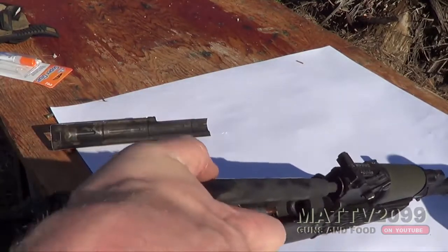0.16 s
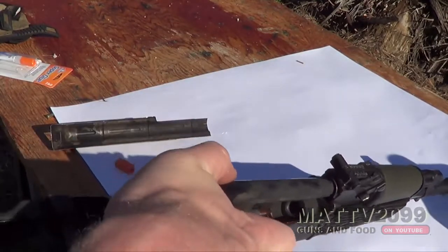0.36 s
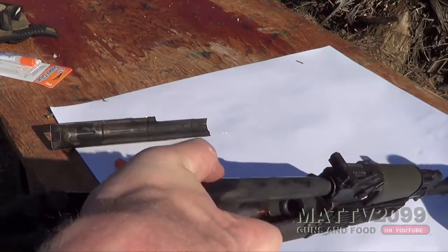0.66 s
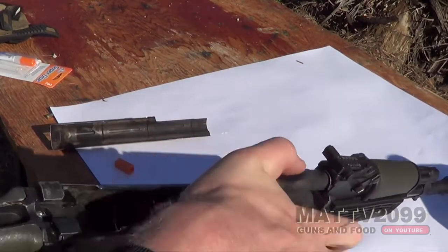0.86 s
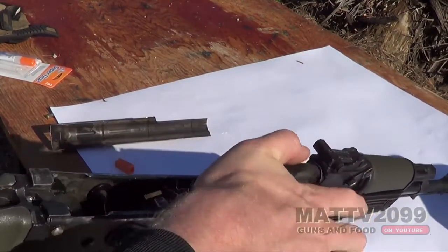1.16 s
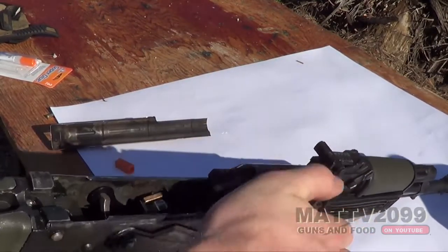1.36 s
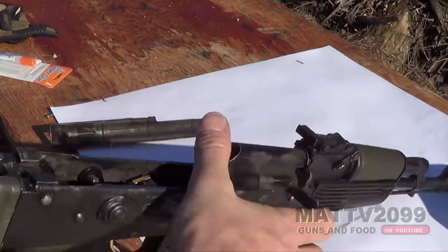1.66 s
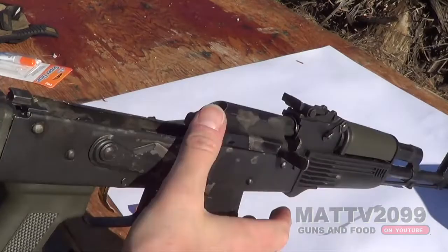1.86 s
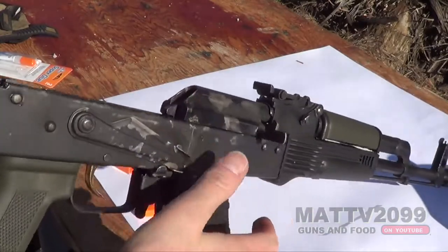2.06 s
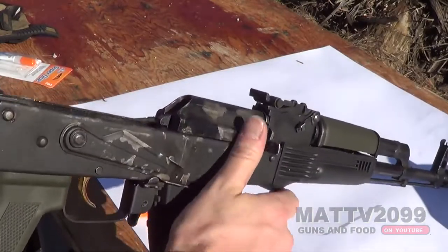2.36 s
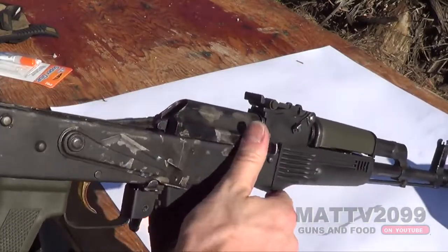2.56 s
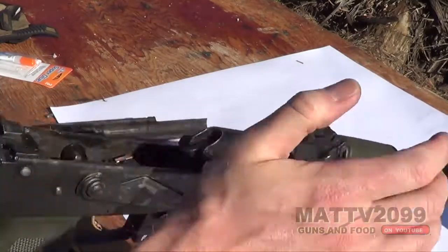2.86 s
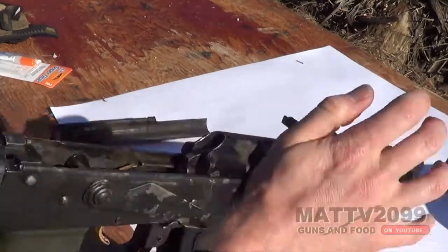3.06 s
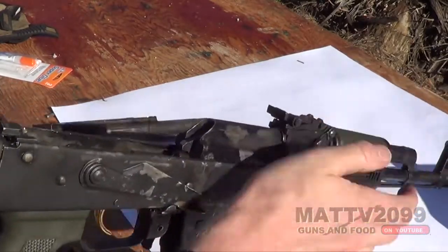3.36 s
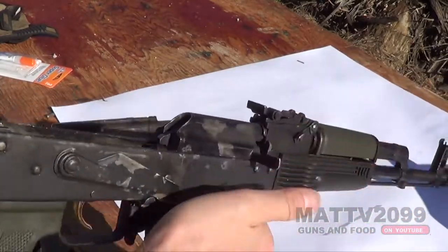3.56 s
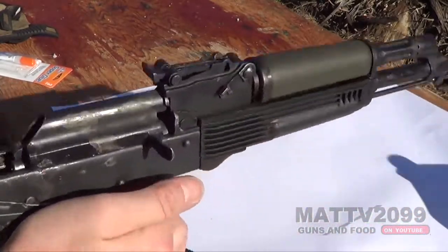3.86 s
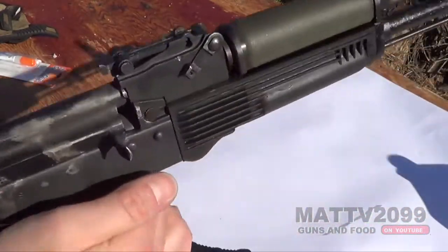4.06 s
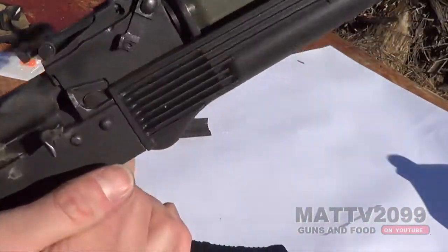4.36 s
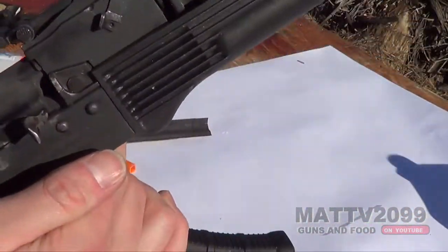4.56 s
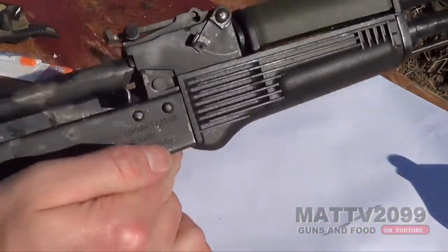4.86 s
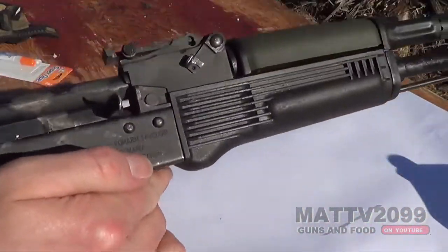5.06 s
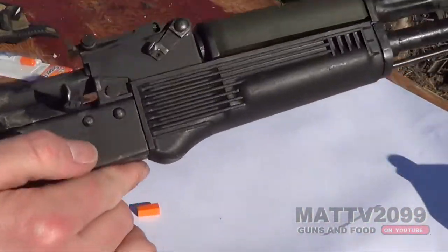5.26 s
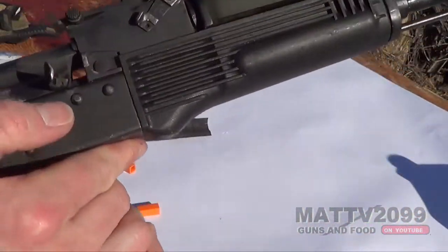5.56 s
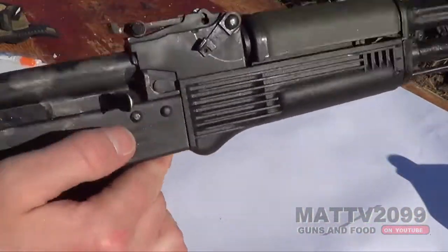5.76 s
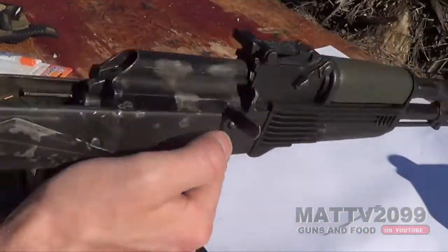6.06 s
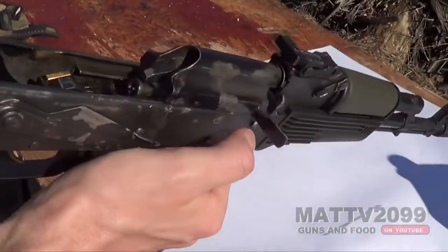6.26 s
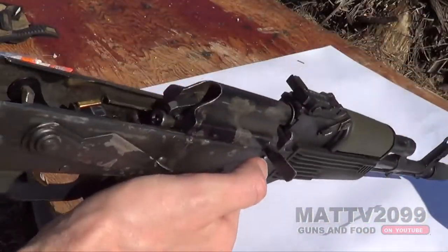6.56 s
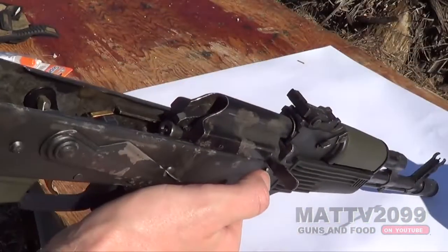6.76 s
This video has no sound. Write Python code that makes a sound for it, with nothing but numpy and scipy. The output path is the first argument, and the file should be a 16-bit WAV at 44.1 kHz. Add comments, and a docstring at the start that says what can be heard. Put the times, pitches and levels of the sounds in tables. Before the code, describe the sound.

Close to the microphone on a wooden table outdoors, a steel rifle's action is fitted with sharp clacks, short gritty scrapes, bright pings and a tiny rising squeak in the first second. After a pause, softer thuds, rubbing hands and a cluster of clacks follow around three seconds. It then goes nearly quiet, with a faint sliding hiss, and ends on a strong low thump with a metallic scrape.

```python
"""A steel rifle is handled close to the microphone on a wooden table outdoors, in still air.
First its bolt carrier is fitted and pushed home: taps ring the steel modes of the receiver, stick-slip
grinds them, small parts ping on sine tones, one squeak glides upward, and soft pushes thump the table.
Then the rifle is turned in the hands: grit noise rubs, loose parts tick, and the carrier glides softly.
Last it is set down with a thump. Dull scatter, coloured noise and a thin whine lie around it all."""
import sys
import numpy as np
from scipy import signal
from scipy.fft import rfft, irfft
from scipy.io import wavfile
from scipy.ndimage import uniform_filter1d, minimum_filter1d

SR = 44100
rng = np.random.default_rng(int(sys.argv[2]) if len(sys.argv) > 2 else 0)


def generate_wav(signal):
    """Clip the signal to [-1, 1] and save it as 16-bit WAV at the path in sys.argv[1]."""
    frames = np.transpose(np.atleast_2d(signal))
    scaled = np.clip(frames, -1, 1) * 32767
    pcm = np.round(scaled).astype(np.int16)
    wavfile.write(sys.argv[1], SR, pcm)


N = 304621

RING_S = 0.3  # length of every computed ring
THUD_HZ, BRIGHT_HZ, TOP_HZ = (100, 700), (3300, 16000), 16000
# Colour of grit rubbed close to the microphone. Each row: frequency in Hz, filter gain in dB.
RUB_COLOUR = [(200, -6), (650, -9), (1700, -4), (4500, -8), (8500, -1.5), (15000, -9)]


def undb(db):
    """Decibels to gain."""
    return 10 ** (np.asarray(db) / 20)


def unit(x):
    """Scale to rms 1."""
    return x / np.sqrt(np.mean(x ** 2) + 1e-30)


def ring_time():
    """Time axis of one dying ring, in seconds."""
    return np.arange(int(RING_S * SR)) / SR


def fade(t, t60):
    """Exponential decay, 60 dB down at t60 seconds."""
    return np.exp(-np.log(1000) * t / t60)


def band(x, lo_hz, hi_hz, order=3):
    """Causal band-pass."""
    edges_hz = [lo_hz, min(hi_hz, SR / 2 - 1)]
    return signal.sosfilt(signal.butter(order, edges_hz, "band", fs=SR, output="sos"), x)


def colour(x, points, size=2048):
    """Causal filter through (Hz, dB) points, from the cepstrum of its log gain."""
    hz, db = np.transpose(points)
    grid = np.maximum(np.arange(size // 2 + 1) * SR / size, 1)
    gain = undb(np.interp(np.log(grid), np.log(hz), db))
    cepstrum = irfft(np.log(gain))
    # folding the cepstrum forward makes the filter minimum-phase
    cepstrum[1:size // 2] *= 2
    cepstrum[size // 2 + 1:] = 0
    response = irfft(np.exp(rfft(cepstrum)))
    return signal.fftconvolve(x, response)[:len(x)]


def add(out, s, x):
    """Mix x into out from time s on."""
    i = max(int(s * SR), 0)
    out[i:i + len(x)] += x[:max(len(out) - i, 0)]


def asperities(n, per_s, spread_db):
    """Tiny impacts of rough surfaces: random moments, signs and sizes."""
    hits = rng.random(n) < per_s / SR
    signs = rng.choice([-1, 1], n)
    return hits * signs * undb(spread_db * rng.standard_normal(n))


def blows(first_db=1):
    """Each blow is a first touch, a chatter that lasts longer the stronger it is, then loose parts settling."""
    # Steel meets steel. Each row: start in seconds, clack level in dB,
    # hardness (bright tick over clack) in dB, pitch of the spot struck in Hz.
    blow_rows = [(0.015, -15, -5.5, 2006), (0.0882, -28, -2, 1430), (0.2521, -20, 1, 1900),
                 (0.2817, -12, -3, 2000), (0.3088, -17.5, 4, 3260), (0.379, -30.5, 2, 2100),
                 (0.3849, -20.5, 12, 1940), (0.4225, -21, 2, 2590), (0.5517, -40, -17, 1100),
                 (0.6325, -29.5, -26, 600), (0.67, -52, 14, 5950), (0.722, -28.5, 7, 1700),
                 (0.8472, -20, 2.5, 2900), (0.867, -25.5, -8, 1750), (0.877, -37, 15.5, 1900),
                 (0.916, -18, 4, 1860), (0.9559, -18, -1, 1830), (0.978, -18.5, 1, 1830),
                 (1.0004, -28, 20, 2840), (1.548, -40.5, -8, 1530), (1.8141, -25, -8, 1040),
                 (1.8170, -22, -19, 1890), (2.5148, -33.5, -24, 1030), (2.526, -43, -10, 2230),
                 (2.5561, -37.5, -24, 1090), (2.598, -40, 5.5, 8400), (2.662, -45, 3.5, 1710),
                 (2.724, -43.5, -14, 1120), (2.802, -44.5, -4, 10200), (2.881, -34, -6.5, 2340),
                 (2.982, -36, -23, 1120), (3.0217, -31, -8.5, 1065), (3.03, -27.5, -14, 2340),
                 (3.0738, -39.5, -11, 2370), (3.1881, -21.5, 7, 1660), (3.2113, -25, -5, 2280),
                 (3.2976, -28, -15, 2160), (3.4165, -27.5, -19, 1840), (3.4595, -23, -8.5, 1760),
                 (3.4926, -38.5, -17, 10000), (3.5118, -39, -5.5, 2330), (3.668, -35, -19, 9340),
                 (4.801, -50, 3, 2320), (4.9155, -37, 5.5, 3210), (5.2, -47, -7, 1300),
                 (5.217, -38.5, 3, 3400), (5.412, -53, -4, 3750), (6.131, -31, -16, 2220),
                 (6.796, -33, 3, 2110)]
    # a blow of the usual level chatters for usual_s, twice as long for each doubling_db more
    usual_db, usual_s, doubling_db = -29.5, 0.0026, 15
    out, t = np.zeros(N), ring_time()
    for s, db, hardness_db, pitch_hz in blow_rows:
        chatter_s = usual_s * 2 ** ((db - usual_db) / doubling_db)
        chatter = np.exp(-(t / chatter_s) ** 2)
        settling = undb(-25) * fade(t, 0.08)
        force = asperities(len(t), per_s=5000, spread_db=3) * (chatter + settling)
        force[0] += undb(first_db)
        add(out, s, contact(force, db, hardness_db, pitch_hz, span=0.01, crack_t60=0.029,
                            thud_db=-18, spot_db=-3.5, below=3.4))
    return out


def contact(force, level_db, hardness_db, pitch_hz, span, crack_t60, thud_db, spot_db,
            below, above=1.033, spot_t60=0.023):
    """A force rings the steel around the pitch of the spot touched; edges brighten it and the table thuds."""
    # Colour of struck steel. Each row: frequency in Hz, filter gain in dB.
    steel_colour = [(300, -4.5), (600, 1.5), (770, -4.5), (1050, 4), (1400, -0.5), (1900, 8), (2350, 7.5),
                    (2650, 5.5), (3700, 14), (9500, 22), (12800, 7), (16000, -4)]
    t, n = ring_time(), len(force)
    steel = colour(signal.fftconvolve(force, receiver(crack_t60))[:n], steel_colour)
    spot_ring = np.sin(2 * np.pi * pitch_hz * t) * fade(t, spot_t60)
    spot = signal.fftconvolve(force, spot_ring)[:n]
    body = unit(band(steel, pitch_hz / below, pitch_hz * above, order=2))
    clack = unit(body + undb(spot_db) * unit(spot))
    thud = unit(band(signal.fftconvolve(force, table())[:n], *THUD_HZ))
    bright = unit(band(steel, *BRIGHT_HZ))
    mix = clack + undb(thud_db) * thud + undb(hardness_db) * bright
    # the clack carries as much energy as its level held for the span
    return undb(level_db) * mix * np.sqrt(span / RING_S)


def receiver(dense_t60, damping=0.64, modes_db=-13, snap_db=-2):
    """Response of the steel to one tap: a snap, a dense short crack and modes whose mix varies by tap."""
    # Modes of the steel receiver. Each row: frequency in Hz and level in dB, both before scatter,
    # t60 in seconds before the holding hand damps it.
    receiver_modes = [(615, -8, .2), (1040, -2, .06), (1780, 0, .04), (2300, -3, .04), (3150, 0, .03),
                      (5043, -8, .05), (8130, -1, .07), (8760, -1, .06), (9450, -1, .08), (11720, 2, .07)]
    scatter_db, detune, held_t60 = 2.5, 0.012, 0.25  # detune as a share of the pitch
    t = ring_time()
    noise = rng.standard_normal(len(t))
    edges = np.geomspace(THUD_HZ[0], TOP_HZ, 8)
    crack = np.zeros(len(t))
    for lo, hi in zip(edges, edges[1:]):
        # the gripping hand damps the high bands soonest
        crack += band(noise, lo, hi, order=2) * fade(t, dense_t60 * (2000 / hi) ** damping)
    chance = rng.standard_normal((len(receiver_modes), 3))
    modes = np.zeros(len(t))
    for (hz, db, t60), (a, b, phase) in zip(receiver_modes, chance):
        tone = np.sin(2 * np.pi * (hz * (1 + detune * b) * t + phase))
        modes += undb(db + scatter_db * a) * tone * fade(t, t60)
    modes = unit(modes * fade(t, held_t60))
    snap = unit(band(signal.unit_impulse(len(t)), 200, 6000, order=1))
    return undb(snap_db) * snap + unit(crack) + undb(modes_db) * modes


def grinds(release_s=0.0073, grit_db=-14, bite_share=0.18):
    """Dragged steel sticks and slips every few milliseconds, with finer grit between."""
    # Steel dragged over steel. Each row: start in seconds, length in seconds, rasp level in dB,
    # hardness (bright scratch over rasp) in dB.
    grind_rows = [(0.42, 0.011, -21.5, 8), (0.731, 0.0029, -17, 7.5), (0.852, 0.014, -21.5, -1.5),
                  (0.879, 0.036, -24.5, -0.5), (0.935, 0.013, -20, 4), (0.952, 0.015, -17.5, 12),
                  (0.966, 0.024, -18, 5), (1.001, 0.012, -20, 7), (2.526, 0.15, -51, -23),
                  (2.863, 0.032, -36, -4), (3.195, 0.025, -27.5, -0.5), (3.428, 0.012, -25.5, -5.5),
                  (3.558, 0.02, -38.5, -2), (3.622, 0.019, -32, 6.5), (3.655, 0.024, -32, -6.5),
                  (6.805, 0.012, -23, 3), (6.827, 0.059, -37, -10.5)]
    # a harder scrape sounds higher: pitch at hardness 0, hardness that adds an octave, pitch limits
    base_hz, octave_db, lowest_hz, highest_hz = 1910, 8.5, 1000, 2800
    out, t = np.zeros(N), ring_time()
    for s, length, db, hardness_db in grind_rows:
        moments = np.cumsum(rng.uniform(0.001, 0.0055, len(t)))
        moments = moments[moments < t[-1]] - moments[0]
        slips = np.zeros(len(t))
        slips[(moments * SR).astype(int)] = undb(4 * rng.standard_normal(len(moments)))
        grit = asperities(len(t), per_s=3000, spread_db=2)
        bite = np.minimum(t / (bite_share * length), 1)
        release = np.exp(-np.maximum(t - length, 0) / release_s)
        force = (slips + undb(grit_db) * grit) * bite * release
        pitch_hz = np.clip(base_hz * 2 ** (hardness_db / octave_db), lowest_hz, highest_hz)
        add(out, s, contact(force, db, hardness_db, pitch_hz, span=length, crack_t60=0.0083,
                            thud_db=-14, spot_db=-38, below=5.1))
    return out


def pings():
    """Small hard parts spring free, ring on one pitch and die away."""
    # Each row: start in seconds, pitch in Hz, starting level in dB, t60 in seconds.
    ping_rows = [(.4235, 8600, -21, .04), (.7235, 8500, -15, .025), (.731, 8113, -15, .08),
                 (1.015, 9238, -32, .17), (1.018, 4167, -25, .17), (4.915, 3784, -47, .2)]
    out, t = np.zeros(N), ring_time()
    for s, hz, db, t60 in ping_rows:
        add(out, s, undb(db) * np.sin(2 * np.pi * hz * t) * fade(t, t60))
    return out


def squeak(t60=0.06):
    """The carrier's steel catches on steel and sings, ever higher as it is forced on."""
    # One row: start in seconds, length in seconds, level in dB before the fade,
    # first pitch in Hz, last pitch in Hz.
    s, length, db, first_hz, last_hz = (.851, .024, -11, 8700, 9400)
    out = np.zeros(N)
    t = np.arange(int(length * SR)) / SR
    song = signal.chirp(t, first_hz, length, last_hz, "quadratic") * fade(t, t60)
    add(out, s, undb(db) * song * signal.get_window(("tukey", 0.2), len(t)))
    return out


def bumps(below=1.48, above=1.94, shove_db=-7, shove_cycles=1.3):
    """The rifle's weight bumps table or palm: a soft push shoves it and rings it around one pitch. A low thump
    also sounds at the very start."""
    # Each row: start in seconds, peak level of the ring in dB, pitch of the thump in Hz. # The first row is a
    # low thump already sounding as the scene opens.
    bump_rows = [(0.002, -22.5, 193), (0.017, -22, 378), (0.088, -24.5, 302), (.283, -23.5, 267),
                 (0.632, -30.5, 420), (0.919, -23, 450), (1.016, -21.5, 390), (1.552, -25.5, 141),
                 (2.442, -30, 318), (2.548, -35, 130), (2.604, -29, 333), (2.726, -33.5, 75),
                 (2.777, -32.5, 410), (3.019, -20, 117), (3.219, -19, 252), (3.432, -22, 268),
                 (3.501, -29.5, 101), (6.7964, -7, 250), (6.801, -13.5, 124)]
    out, t = np.zeros(N), ring_time()
    for s, db, hz in bump_rows:
        ring = band(table(), hz / below, hz * above, order=2)
        shove = np.sin(np.pi * np.minimum(t * hz / shove_cycles, 1)) ** 2
        shove = band(shove, hz / 5, THUD_HZ[1], order=2)
        add(out, s, undb(db) * (ring / np.abs(ring).max() - undb(shove_db) * shove))
    return out


def table(scatter_db=1.6, detune=0.025):
    """Response of the wooden top to one tap: a few modes over the short, dense knock of its boards."""
    # Modes of the table under the rifle. Each row: frequency in Hz and level in dB,
    # both before scatter, t60 in seconds.
    table_modes = [(66, -7, .1), (138, -3, .15), (168, -9, .08), (240, -1, .06), (289, -5.5, .12),
                   (425, -8, .07), (615, -8, .14)]
    t = ring_time()
    chance = rng.standard_normal((len(table_modes), 2))
    modes = np.zeros(len(t))
    for (hz, db, t60), (a, b) in zip(table_modes, chance):
        tone = np.cos(2 * np.pi * hz * (1 + detune * b) * t)
        modes += undb(db + scatter_db * a) * tone * fade(t, t60)
    boards = unit(band(rng.standard_normal(len(t)), *THUD_HZ)) * fade(t, 0.14)
    return modes + boards / 2


def slides(top_hz=10500):
    """The oiled carrier glides along its rails, hissing and singing in hollows; each push swells and sinks."""
    # Uneven pushes. Each row: start in seconds, length in seconds, level at the middle in dB.
    slide_rows = [(4.1, 0.15, -45), (5.824, 0.087, -46.5), (5.889, 0.21, -46), (6.077, 0.14, -42.5),
                  (6.176, 0.2, -46.5)]
    # Hollows of the receiver that the sliding excites. Each row: frequency in Hz, added band in dB.
    hollow_rows = [(1280, 3), (1830, 3), (3800, 2)]
    grit = band(friction(catch_db=1.5), THUD_HZ[0], top_hz, order=1)
    singing = sum(undb(db) * band(grit, hz / 1.035, hz * 1.035, order=1) for hz, db in hollow_rows)
    t = np.arange(N) / SR
    power = np.zeros(N)
    for s, length, db in slide_rows:
        power += undb(db) ** 2 * np.sin(np.pi * np.clip((t - s) / length, 0, 1))
    # rounding can leave the sine's end a hair off zero, never audibly
    return unit(grit + singing) * np.sqrt(np.maximum(power, 0))


def friction(catch_db=3.0, catch_s=0.022):
    """Fine grit of two sliding surfaces that catch and let go."""
    catch = unit(uniform_filter1d(rng.standard_normal(N), int(catch_s * SR)))
    grit = asperities(N, per_s=9000, spread_db=4)
    return colour(grit * undb(catch_db * catch), RUB_COLOUR)


def rubbing(pressure, ticks_db=-44):
    """Fingers rub over the steel, and now and then a loose part ticks."""
    tap = colour(receiver(dense_t60=0.025), RUB_COLOUR)
    moments = asperities(N, per_s=11.0, spread_db=5)
    ticks = signal.fftconvolve(moments, tap / np.abs(tap).max())[:N]
    rub = unit(friction()) * pressure
    return band(rub + undb(ticks_db) * ticks, THUD_HZ[0], TOP_HZ, order=2)


def hand_pressure(grip_db=-66, turning_db=-53):
    """A steady creeping grip, firmer while turning the rifle, with single strokes on top."""
    # A hand rubs over the rifle. Each row: start in seconds, length in seconds,
    # level in dB before the rubbing is band-passed.
    stroke_rows = [(1.718, 0.029, -41.5), (1.89, 0.048, -44), (2.202, 0.037, -45.5), (2.424, 0.25, -47.5),
                   (2.737, 0.049, -47.5), (3.199, 0.049, -23), (3.4, 0.099, -39.5), (3.566, 0.13, -43.5),
                   (3.842, 0.082, -44.5), (4.903, 0.052, -45), (6.803, 0.011, -28.5)]
    # The rifle is being turned over: start in seconds, end in seconds.
    turning = (1.62, 4.35)
    power = undb(grip_db) ** 2 + (undb(turning_db) * swell(*turning)) ** 2
    for s, length, db in stroke_rows:
        power += (undb(db) * swell(s, s + length)) ** 2
    return np.sqrt(power)


def swell(start, end, attack_s=0.023, release_s=0.027):
    """A stroke swells ahead of its start, holds and lets go after its end."""
    corners = [start - attack_s, start, end, end + release_s]
    return np.interp(np.arange(N) / SR, corners, [0, 1, 1, 0])


def shiver(knocks, level_db=-17.5, t60=0.2):
    """Loose parts take up a share of each knock's sharp edge and lose it slowly."""
    keep = fade(1 / SR, t60) ** 2  # power kept from sample to sample
    edge_power = band(knocks, *BRIGHT_HZ) ** 2
    return undb(level_db) * np.sqrt(signal.lfilter([1 - keep], [1, -keep], edge_power))


def surroundings(x, wet_db=-21, t60=0.25, delay_s=0.00087, dull_hz=1300):
    """Ground and nearby things scatter a thin, dull tail back."""
    t = ring_time()
    tail = band(rng.standard_normal(len(t)), 130, dull_hz, order=1) * fade(t, t60) * (t > delay_s)
    return undb(wet_db) * signal.fftconvolve(x, unit(tail) / np.sqrt(len(t)))[:N]


def background(air_db=-54, whine_hz=15732, whine_db=-67):
    """Still outdoor air and microphone hiss as one coloured noise, and a faint electronic whine."""
    # Colour of the still air. Each row: frequency in Hz, filter gain in dB.
    air_colour = [(15, -62), (25, -9.5), (113, -6), (1400, -17.5), (14000, -26.5)]
    air = unit(colour(rng.standard_normal(N), air_colour))
    whine = np.sqrt(2) * np.sin(2 * np.pi * whine_hz * np.arange(N) / SR)
    return undb(air_db) * air + undb(whine_db) * whine


def scene():
    """The rifle on the table, in the open."""
    knocks = blows() + grinds() + pings() + squeak() + bumps()
    pressure = np.hypot(hand_pressure(), shiver(knocks))
    rifle = knocks + slides() + rubbing(pressure)
    return (rifle + surroundings(rifle) + background())[None]


def record(dry, ceiling=0.58):
    """A fast limiter holds the loudest peaks down, and the recorder cuts the top."""
    size = SR // 1000  # one millisecond
    gain = np.minimum(1, ceiling / (np.abs(dry) + 1e-9))
    gain = uniform_filter1d(minimum_filter1d(gain, 2 * size + 1), size)
    top_cut = signal.ellip(8, 0.2, 70, TOP_HZ, fs=SR, output="sos")
    return signal.sosfilt(top_cut, dry * gain)


dry = scene()
out = record(dry)
generate_wav(out)
```